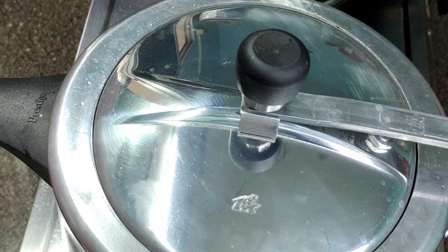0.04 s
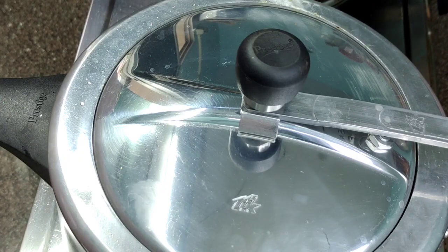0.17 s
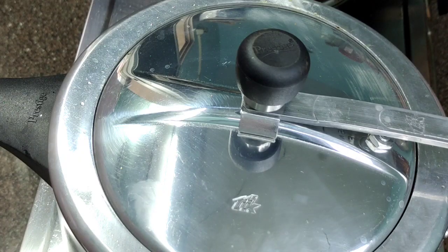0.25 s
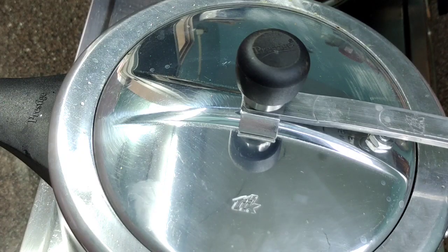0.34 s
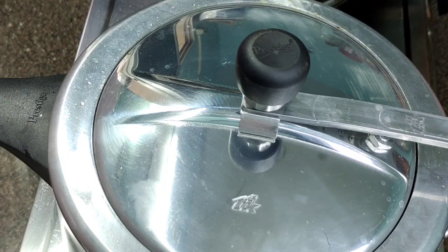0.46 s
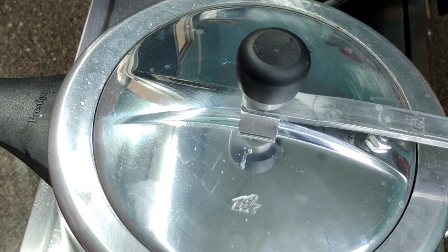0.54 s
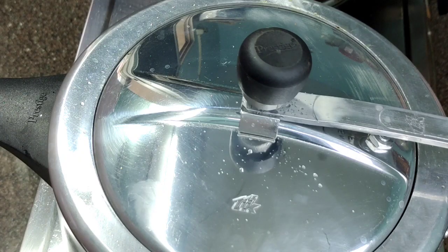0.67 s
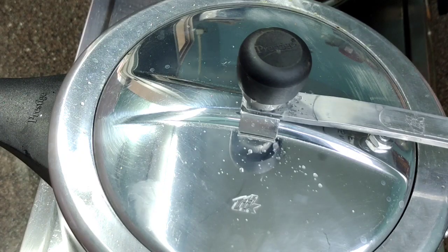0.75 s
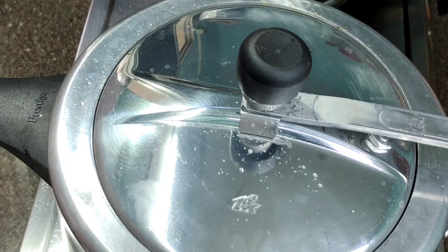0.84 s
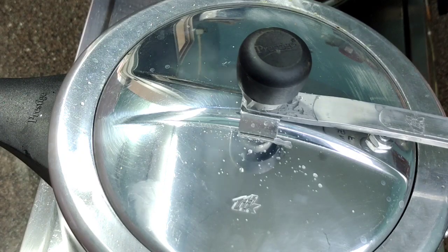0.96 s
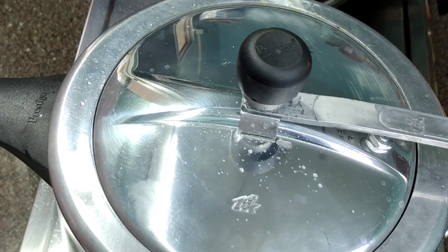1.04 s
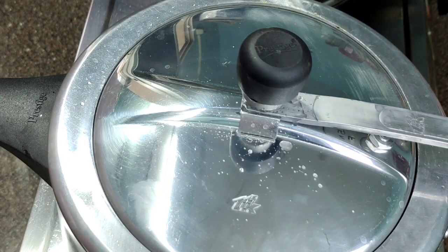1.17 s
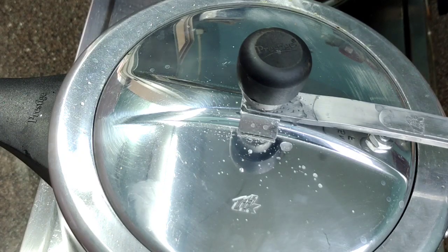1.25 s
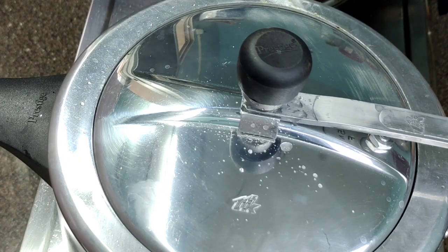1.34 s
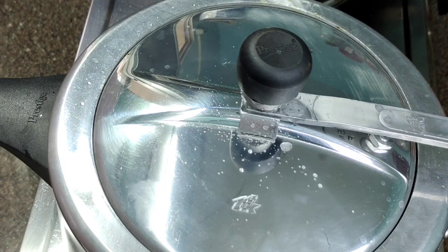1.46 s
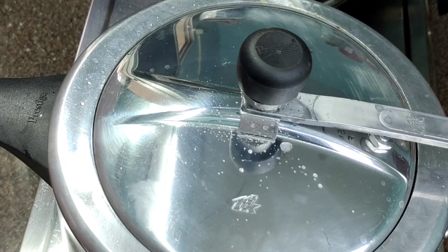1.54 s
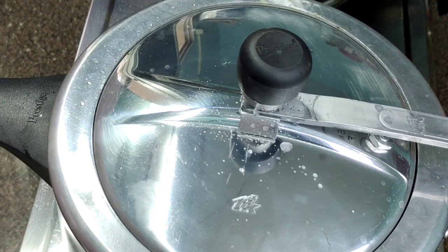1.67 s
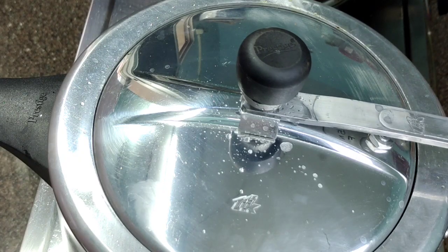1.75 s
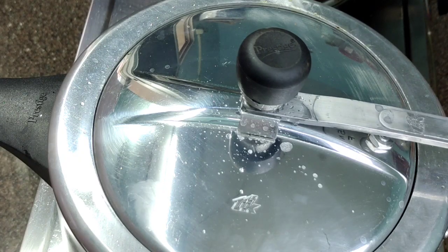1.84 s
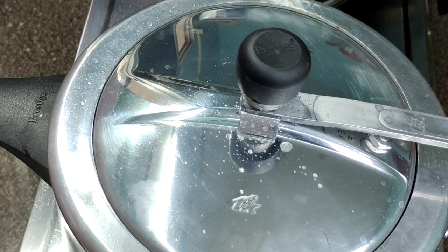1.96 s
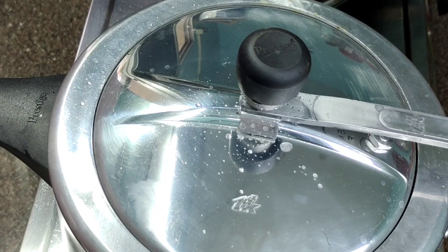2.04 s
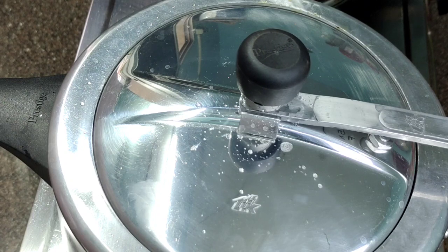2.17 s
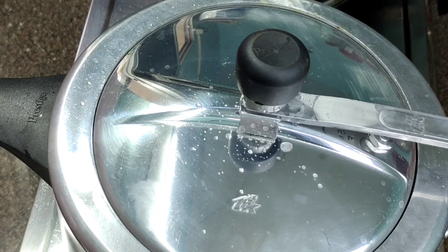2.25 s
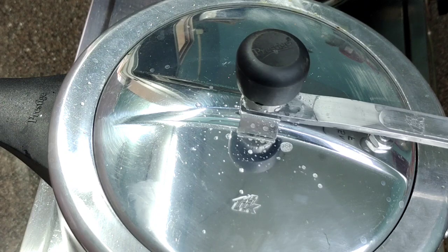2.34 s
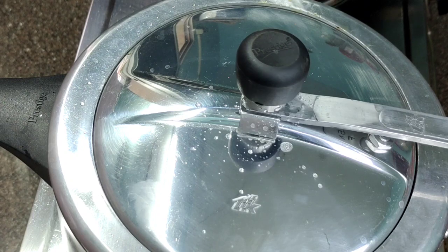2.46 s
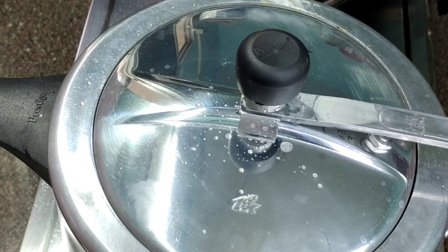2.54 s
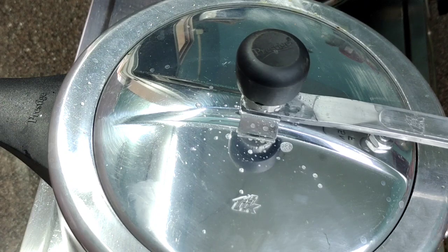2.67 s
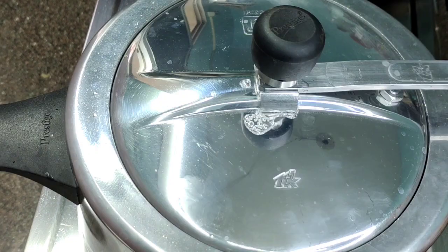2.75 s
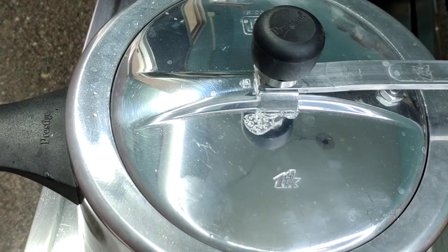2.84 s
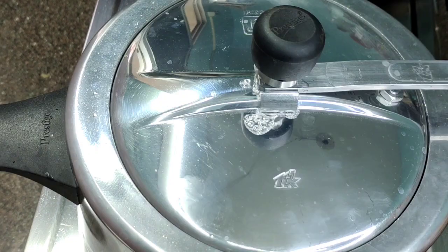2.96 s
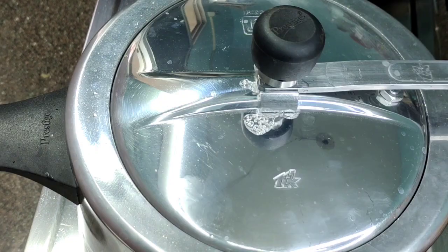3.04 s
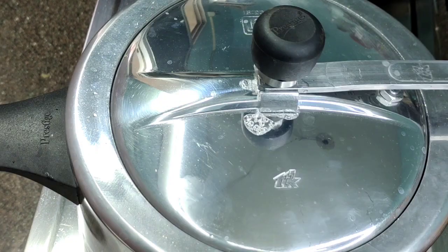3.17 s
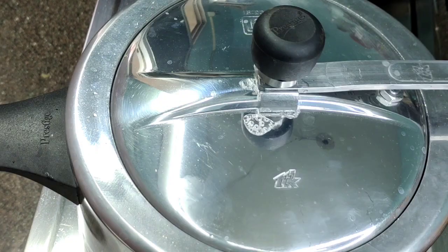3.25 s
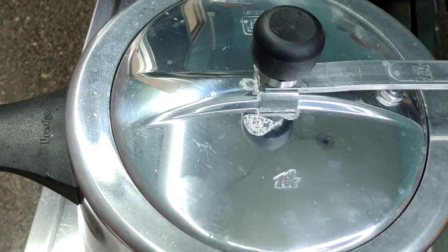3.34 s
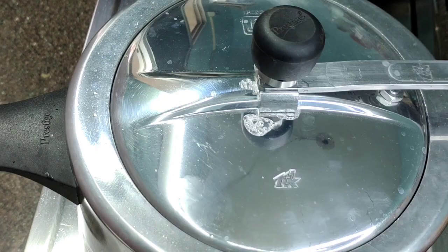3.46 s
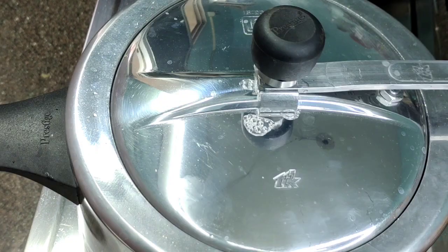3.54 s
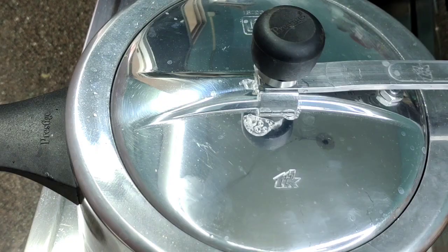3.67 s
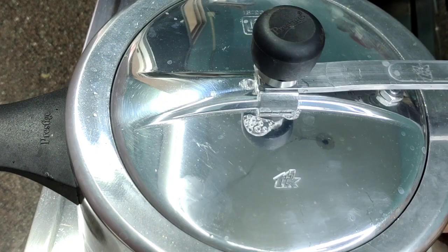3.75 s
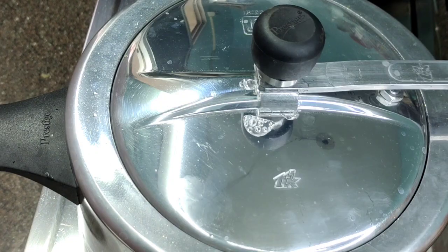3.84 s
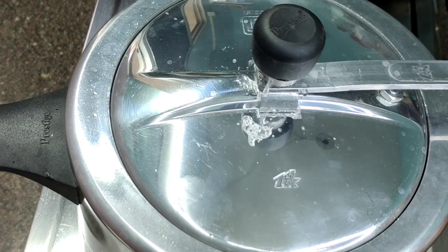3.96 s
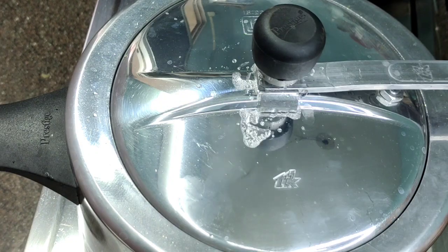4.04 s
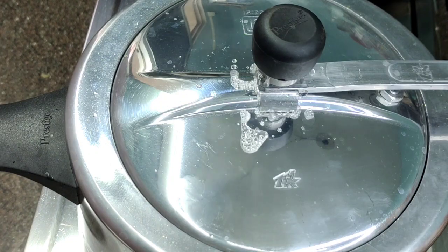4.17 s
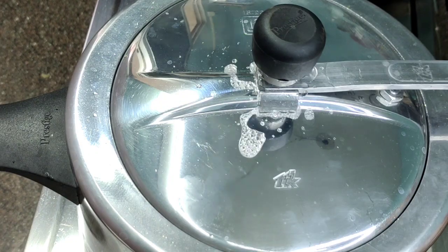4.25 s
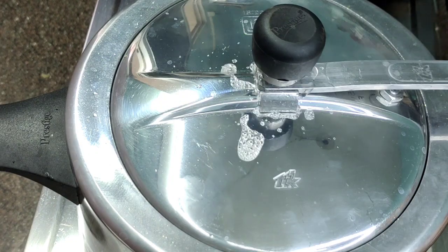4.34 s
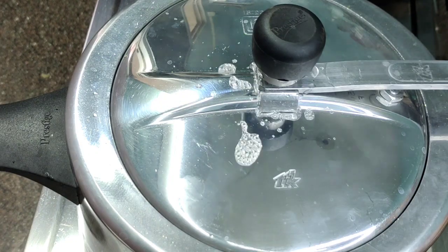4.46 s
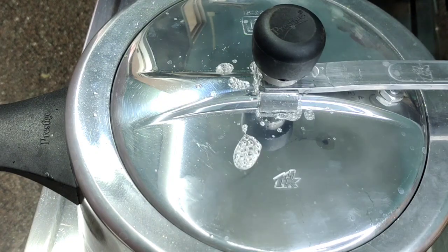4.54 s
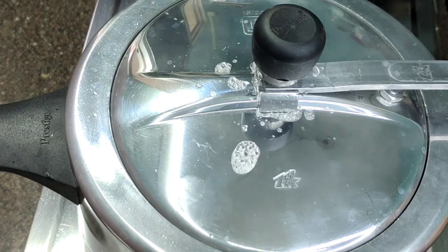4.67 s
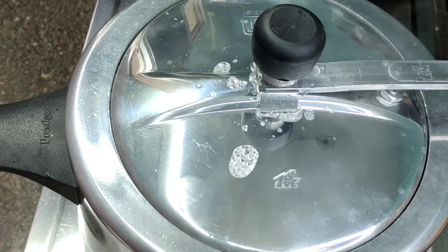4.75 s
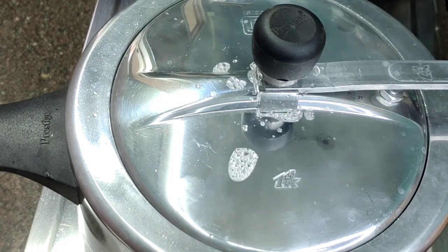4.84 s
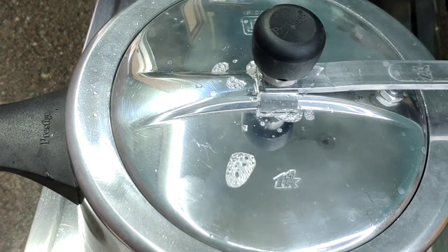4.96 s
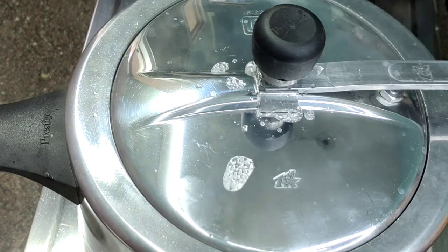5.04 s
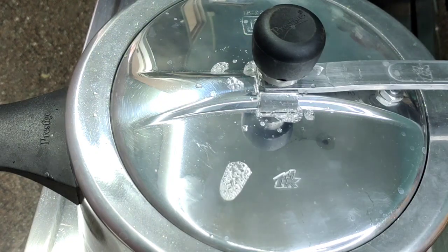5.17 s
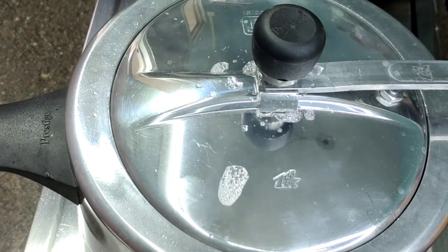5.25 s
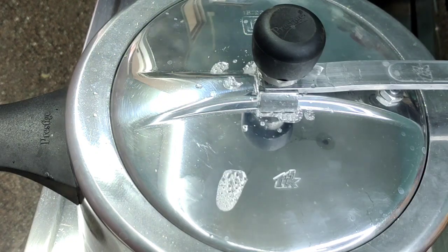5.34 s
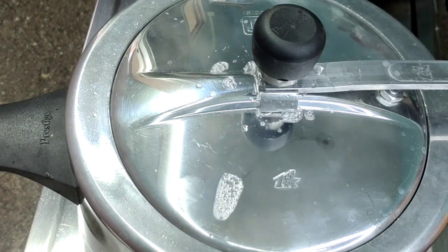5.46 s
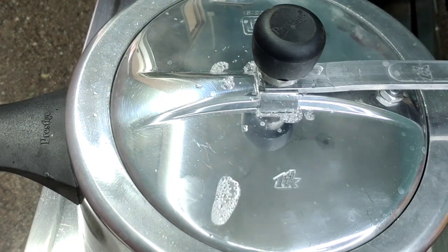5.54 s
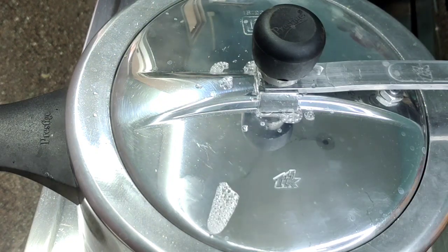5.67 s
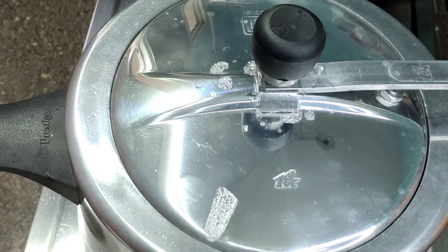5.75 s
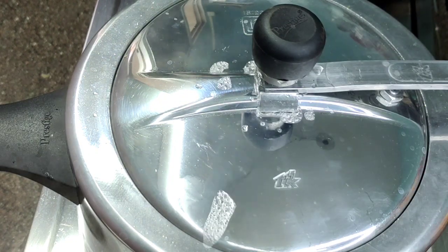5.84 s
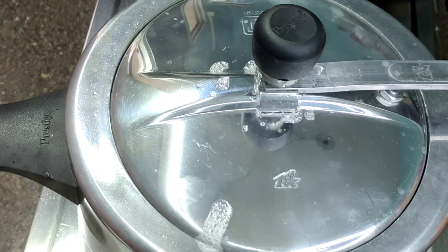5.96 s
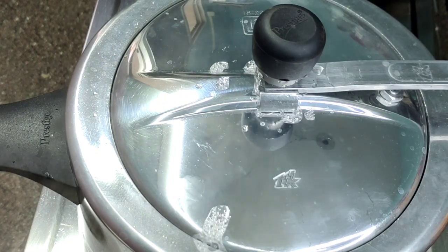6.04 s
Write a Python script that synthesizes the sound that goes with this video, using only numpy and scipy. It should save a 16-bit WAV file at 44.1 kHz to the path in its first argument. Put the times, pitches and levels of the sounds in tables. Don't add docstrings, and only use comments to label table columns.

```python
import sys
import numpy as np
from scipy import signal
from scipy.fft import rfft, irfft
from scipy.io import wavfile
from scipy.ndimage import uniform_filter1d

SR = 44100
rng = np.random.default_rng(int(sys.argv[2]) if len(sys.argv) > 2 else 0)


def gain_from_db(level_db):
    decades = np.asarray(level_db, float) / 20
    return 10 ** decades


def persist_wave(psi):
    counts = np.round(np.clip(psi, -1, 1) * 32767).astype(np.int16)
    wavfile.write(sys.argv[1], SR, np.atleast_2d(counts).T)


N = 269274
HZ = np.fft.rfftfreq(N, 1 / SR)
T = np.arange(N) / SR

# (time [s], level [dB], lift of the weight [0-1])
BURSTS = [
    [(.362, -30.5, 0.04), (.49, -33, 0.37), (.56, -21.5, 0.25), (.65, -20.5, 0.81), (.78, -20.5, 0.96),
     (1.2, -21, 0.96), (1.6, -21.5, 0.91), (1.9, -21, 0.79), (2.21, -21.5, 0.64)],
    [(3.772, -54, 1), (3.86, -32.5, 0.8), (3.89, -28.5, 0.75), (3.97, -21, 0.93), (4.1, -23.5, 1),
     (4.7, -22.5, 0.98), (5.4, -22.5, 0.96), (5.5, -22.5, 0.95), (6.11, -22, 0.94)],
]
REGION_EDGES = (2200, 3200, 4400, 5600, 8000, 9800)
FULL_LIFT = [
    (-9, -5, -10.5, -5, -13.5, 0.12, -18.5),
    (-6.5, -6, -9, -2.5, -7, 0.1, -14.5),
]
NARROW_GAP = (-5, -15.5, -16, -4, 2.5, 0.5, 8.5)
SHUT_FALL = (150, 150, 150, 150, 148, 183, 112)
# (frequency [Hz], density [dB per Hz])
STEAM_COLOUR = [(290, -31.5), (500, -22), (1010, -18), (1420, -17.5), (1920, -11.5), (2250, -9.5),
                (2590, -2), (2950, -3), (3710, -0.5), (5230, -6), (5700, -9), (7270, 2), (10100, -7),
                (15300, -9.5)]
# (frequency [Hz], width [Hz], lift [dB])
WEIGHT_MODES = [(2810, 740, -1.5), (3690, 610, 4.5), (4290, 180, 3.5), (7460, 1200, 0.5), (7970, 200, -1.5),
                (6020, 190, -2.5), (5620, 60, -3), (2310, 41, -9), (9920, 1100, -2.5), (14820, 1400, 8)]
# (frequency [Hz], left minus right [dB])
STEAM_BALANCE = [(700, 1.5), (2400, 1), (3600, 4), (4300, 2.5), (5500, -1.5), (7300, 7.5), (8800, -5.5),
                 (11000, 1.5), (13000, 3), (15300, 7)]
# (frequency [Hz], likeness [0-1])
STEAM_ALIKE = [(300, .7), (800, .5), (1500, .45), (3000, .55), (5500, .45), (8000, .2), (15000, .3)]
# (time [s], lift [dB], length [s])
SPUTTERS = [(5.1, -1.5, 0.014), (5.39, 0.5, 0.03), (2.0, 0.5, 0.022), (0.86, 1, 0.016), (1.125, -1, 0.012),
            (1.78, -2.5, 0.066), (0.44, -2, .03), (6.03, 0, 0.029)]
# (time [s], frequency [Hz], width [Hz], level [dB], t60 [s])
WHISTLES = [
    (.358, 8750, 120, -30.5, 0.24),
    (.358, 11100, 150, -35, 0.25),
]
# (frequency [Hz], density [dB per Hz])
SEEP_COLOUR = [(900, -30), (1700, -9), (2640, -4), (4200, -7), (5500, -14), (6570, -7), (7600, -8),
               (9000, -10), (12200, -12), (13800, -14), (14800, -4.5), (15500, -14)]
# (time of reseating [s], time of waking [s], woken level [dB])
LEAKS = [
    (-.5, 0.2, -52.5),
    (2.4, 2.86, -51),
]
# (time [s], lift [dB], length [s])
SPITS = [
    (.34, 6, .06),
    (3.07, 5, 0.016),
    (3.15, 1.5, 0.13),
]
# (time [s], level [dB], low edge [Hz], high edge [Hz], swell [s], t60 [s])
RUMBLES = [(3.768, -27, 115, 710, 0.016, 1), (3.9, -25, 330, 1150, 0.027, 0.39),
           (2.229, -33, 710, 1100, 0.0037, 0.74), (0.563, -30.5, 260, 1200, 0.042, 0.73),
           (3.768, -33.5, 840, 2100, 0.0054, 0.4), (3.93, -16.5, 2000, 3300, 0.019, 0.29),
           (0.595, -33, 1000, 2900, 0.042, 0.44), (0.3465, -32.5, 300, 4000, 0.007, 1),
           (4.1, -44, 3000, 14000, 0.0045, 0.49)]
# (frequency [Hz], level [dB], t60 [s], signed strength [ratio])
STOVE_MODES = [(309.5, 2, 0.45, 0.57), (327.6, 1.5, 0.23, -0.67), (102, -20, 0.28, 0.83),
               (111.2, -9.5, 0.5, -0.81), (213, -8.5, 0.13, 0.85), (226, -13, 0.22, -0.83),
               (410, -15, 0.28, 1), (481, -15.5, 0.26, -1), (774, -8, 0.076, 1)]
SEAT_MODES = [(1020, -3.5, 0.087, 0.87), (1000, -15, 0.33, 0.74), (797, -7, 0.056, -1.3),
              (855, -20, .25, 0.88), (710, -16, .06, 0.9), (940, -13, 0.022, 0.18), (1220, -5.5, 0.034, -1),
              (1740, -20, 0.027, 0.77)]
LID_MODES = [(1466, -0.5, .2, 0.95), (900, 0, .15, 1), (2050, -5, .1, 1)]
# (time [s], level [dB], push [ms])
STOVE_BLOWS = [
    (3.767, -17.5, 1.2),
]
SEAT_BLOWS = [
    (2.228, -18.5, 0.11),
    (2.250, -39, 0.23),
    (2.272, -35, .2),
    (2.425, -45, 0.23),
]
LID_BLOWS = [
    (2.72, -49, .2),
    (3.065, -45.5, 0.22),
]
# (frequency [Hz], density [dB per Hz])
KITCHEN_COLOUR = [(15, -55), (25, -36), (48, -20), (80, -9.5), (109, -1.5), (175, -4), (443, -4.5),
                  (823, -14.5), (1050, -11), (1410, -19), (1840, -16), (2310, -23), (3500, -39),
                  (4550, -48), (7700, -120)]
# (frequency [Hz], likeness [0-1])
KITCHEN_ALIKE = [(30, .7), (70, 1), (150, 0.7), (300, 0.74), (640, 0.93), (1400, 0.5), (3100, 0.6)]
# (frequency [Hz], width [Hz], level [dB])
HUM = [(95.3, 16, -57), (201.6, 27, -56), (460, 40, -60)]
# (time [s], lift [dB], length [s])
HOUSE_SWELL = [(.95, 2.5, 1), (2.6, -0.5, 0.36), (3.6, -0.5, 0.26), (5.3, 0.5, 0.27)]
# (time [s], lift [dB], length [s])
SURGES = [(.05, -11, 0.12), (.24, 3, .07), (.4, -18.5, 0.055), (.9, 3, 0.21), (1.89, 11, .04),
          (2.0, -8, 0.14), (2.55, 3.5, 0.054), (2.74, 8, .05), (2.97, 7, 0.087), (3.8, 6, .08),
          (4.62, 8, .07), (4.86, 7, 0.063), (5.38, -21, 0.11)]

ROOM_T60_S, ROOM_DB = 0.25, -6.5


def level(x, db):
    return x * gain_from_db(db) / np.sqrt(np.mean(x ** 2))


def along(points):
    hz, value = np.transpose(points)
    return np.interp(np.log(HZ + 1), np.log(hz + 1), value)


def walk(rate):
    hold = int(SR / rate)
    steps = np.repeat(rng.standard_normal(N // hold + 1), hold)
    smooth = uniform_filter1d(uniform_filter1d(steps, hold), hold)[:N]
    return smooth / smooth.std()


def bumps(rows):
    return sum(db * np.exp(-((T - at) / length) ** 2) for at, db, length in rows)


def resonance(hz, width):
    return 1 / (1 + (2 * (HZ - hz) / width) ** 2)


def above(edge_hz, steepness):
    return 1 / (1 + (edge_hz / (HZ + 1)) ** steepness)


def pair(alike, mid):
    shared = np.clip(alike, 0, 1)
    side = rfft(rng.standard_normal(N))
    return np.sqrt(1 + shared) * mid + np.sqrt(1 - shared) * side * np.array([[1], [-1]])


def steam():
    droplets = gain_from_db(1.3 * rng.exponential(size=N // 32 + 1)).repeat(32)[:N]
    turbulence = rfft(level(rng.standard_normal(N) * droplets, 0))
    weight_db = sum(db * resonance(hz, width) for hz, width, db in WEIGHT_MODES)
    ears = gain_from_db(along(STEAM_BALANCE) / 2 * np.array([[1], [-1]]))
    spectrum = pair(along(STEAM_ALIKE), turbulence) * gain_from_db(along(STEAM_COLOUR) + weight_db) * ears
    spectrum[0] *= np.exp(-2j * np.pi * HZ * 5e-5)
    passed = [above(edge, 24) for edge in REGION_EDGES]
    shares = [low - high for low, high in zip(passed, passed[1:] + [0])]
    shares.append(1 - passed[0])
    flutter_db = 0.35 * walk(7.1) + 0.55 * walk(35) + bumps(SPUTTERS)
    jet = 0
    for k, share in enumerate(shares):
        band = irfft(spectrum * share, N)
        band /= np.sqrt(np.mean(band.mean(axis=0) ** 2))
        jet = jet + band * region_gain(k) * gain_from_db(flutter_db + 0.3 * walk(16))
    s, _, lift = np.transpose(np.concatenate(BURSTS))
    pan_db = -4 * (1 - np.interp(T, s, lift)) + 0.5 * walk(3.53)
    return jet * gain_from_db(np.array([pan_db, -pan_db]) / 2)


def region_gain(k):
    crack_db_per_s, drop_db, drop_s = 1800, -1.5, 0.02
    gain = 1e-9
    for burst, full_db in zip(BURSTS, FULL_LIFT):
        s, flow_db, lift = np.transpose(burst)
        db = np.interp(T, s, flow_db + full_db[k] + NARROW_GAP[k] * (1 - lift))
        db = db + drop_db * np.clip((T - s[-1]) / drop_s, 0, 1)
        opening_db = crack_db_per_s * np.maximum(s[0] - T, 0)
        closing_db = SHUT_FALL[k] * np.maximum(T - s[-1], 0)
        gain = gain + gain_from_db(db - opening_db - closing_db)
    return gain


def whistles():
    out = 0
    for at, hz, width, db, t60 in WHISTLES:
        spectrum = pair(0.35, rfft(rng.standard_normal(N))) * resonance(hz, width)
        tone = level(irfft(spectrum, N), db)
        out = out + tone * (T > at) * gain_from_db(-60 * np.maximum(T - at, 0) / t60)
    return out


def seep():
    asleep_db, wake_s, reseat_db, reseat_s = -4.5, 0.083, 9.5, 0.058
    asleep_top_db, awake_top_db = -1, 1
    hiss = pair(0.11, rfft(rng.standard_normal(N))) * gain_from_db(along(SEEP_COLOUR))
    whole = irfft(hiss, N)
    top = irfft(hiss * above(6000, 6) + hiss * above(13800, 24), N)
    db, top_db = np.zeros(N), np.zeros(N)
    for seats, wakes, woken_db in LEAKS:
        awake = 0.5 + 0.5 * np.tanh((T - wakes) / wake_s)
        settling_db = reseat_db * np.exp(-np.maximum(T - seats, 0) / reseat_s)
        seated = T > seats - 0.1
        db = np.where(seated, woken_db + asleep_db * (1 - awake) + settling_db, db)
        top_db = np.where(seated, asleep_top_db + (awake_top_db - asleep_top_db) * awake, top_db)
    shaped = (whole + top * (gain_from_db(top_db) - 1)) / whole.std()
    return shaped * gain_from_db(db + bumps(SPITS) + 0.6 * walk(6))


def rumbles():
    out, t = np.zeros((2, N + SR)), T[:SR]
    for at, db, low_hz, high_hz, swell, t60 in RUMBLES:
        mid, side = rng.standard_normal((2, SR))
        ears = mid + 0.67 * side * np.array([[1], [-1]])
        low_edge = signal.butter(N=4, Wn=low_hz, btype="high", fs=SR, output="sos")
        high_edge = signal.butter(N=4, Wn=high_hz, fs=SR, output="sos")
        noise = level(signal.sosfilt(np.vstack([low_edge, high_edge]), ears), db)
        start = int(at * SR)
        out[:, start:start + SR] += noise * (1 - np.exp(-t / swell)) * gain_from_db(-60 * t / t60)
    return out[:, :N]


def blows(events, modes):
    t, out = T[:SR], np.zeros(N + SR)
    ring = sum(sign * gain_from_db(db - 60 * t / t60) * np.sin(2 * np.pi * hz * t) for hz, db, t60, sign in modes)
    for at, db, push_ms in events:
        push = np.hanning(int(push_ms * SR / 1000) + 3)
        start = int(at * SR)
        out[start:start + SR] += gain_from_db(db) * np.convolve(ring, push / push.sum())[:SR]
    return out[:N]


def room(x):
    t = T[:SR // 2]
    echoes = rng.standard_normal((2, len(t))) * gain_from_db(-60 * t / ROOM_T60_S) * (t > 0.002)
    echoes *= gain_from_db(ROOM_DB) / np.sqrt(np.sum(echoes ** 2, axis=1, keepdims=True))
    echoes[:, 0] = 1
    return signal.fftconvolve(x, echoes, axes=1)[:, :N] / np.sqrt(1 + gain_from_db(2 * ROOM_DB))


def kitchen():
    spectrum = pair(along(KITCHEN_ALIKE), rfft(rng.standard_normal(N))) * gain_from_db(along(KITCHEN_COLOUR))
    roar = level(irfft(spectrum, N), -45)
    hum = 0
    for hz, width, db in HUM:
        hum = hum + level(irfft(rfft(rng.standard_normal(N)) * resonance(hz, width), N), db)
    return roar * gain_from_db(bumps(HOUSE_SWELL) + 0.11 * walk(2.58)) + hum


def fan():
    db = -47 + bumps(SURGES) + 2.2 * walk(12)
    blade_hz = 103.3 * (1 + 0.0364 * walk(5))
    return gain_from_db(db) * np.sin(2 * np.pi * np.cumsum(blade_hz) / SR)


def scene():
    knocks = blows(STOVE_BLOWS, STOVE_MODES) + blows(SEAT_BLOWS, SEAT_MODES) + blows(LID_BLOWS, LID_MODES)
    valve = room(steam()) + whistles() + seep() + rumbles()
    struck = 0.74 * knocks + 0.46 * room(np.array([knocks, knocks]))
    return valve + struck + kitchen() + fan()


def roll_off(x):
    return signal.sosfilt(signal.butter(12, 15600, fs=SR, output="sos"), x)


def record(dry):
    soft = np.tanh(dry / 1.1) * 1.1
    low_pass = signal.ellip(12, 0.2, 80, 15500, fs=SR, output="sos")
    return roll_off(signal.sosfilt(low_pass, soft))


dry = scene()
out = record(dry)
persist_wave(out)
```